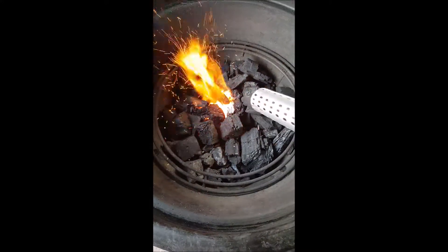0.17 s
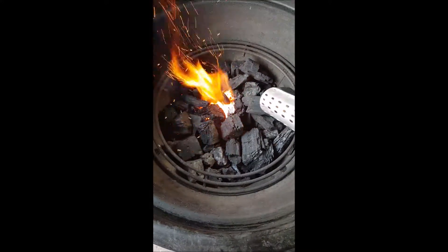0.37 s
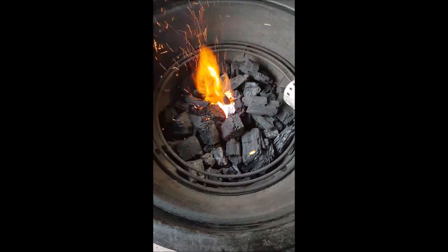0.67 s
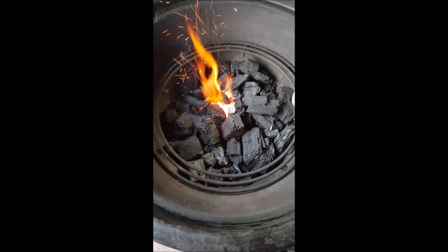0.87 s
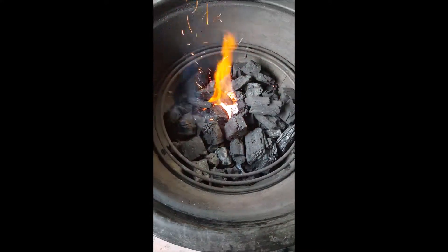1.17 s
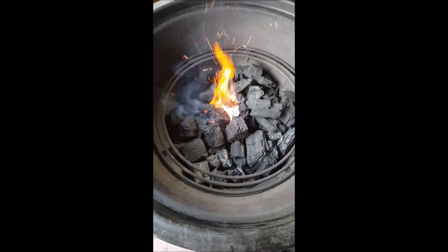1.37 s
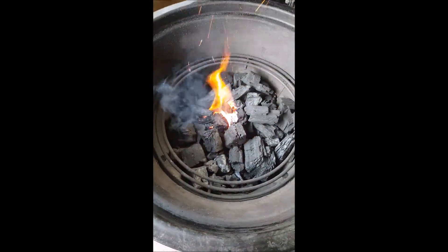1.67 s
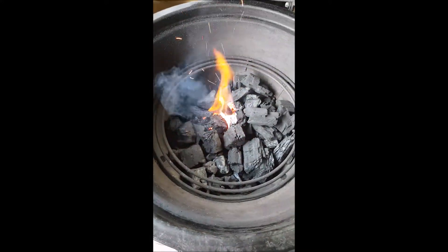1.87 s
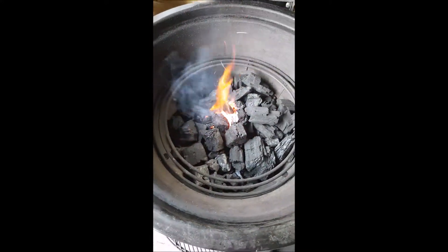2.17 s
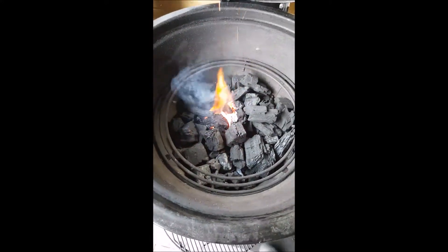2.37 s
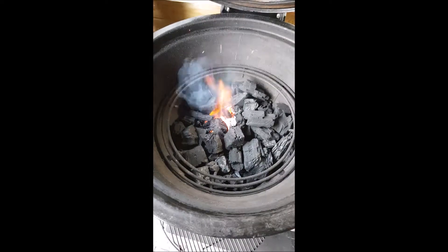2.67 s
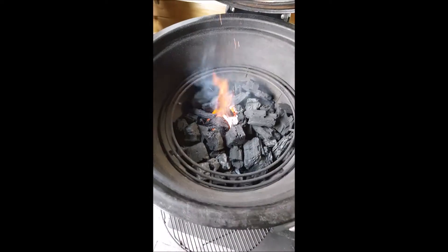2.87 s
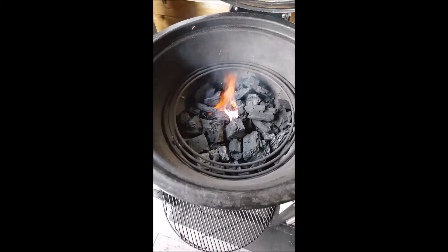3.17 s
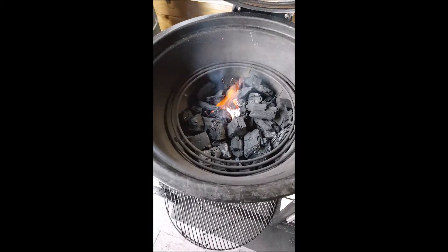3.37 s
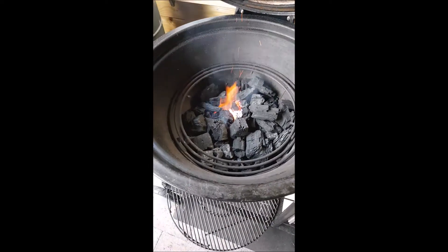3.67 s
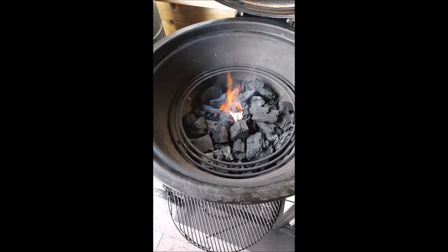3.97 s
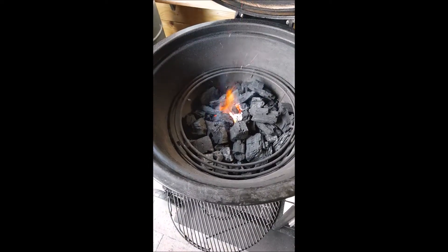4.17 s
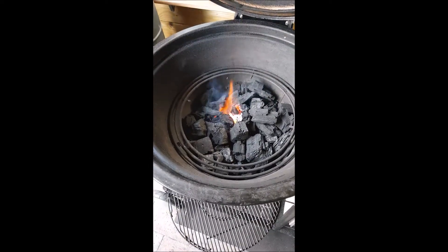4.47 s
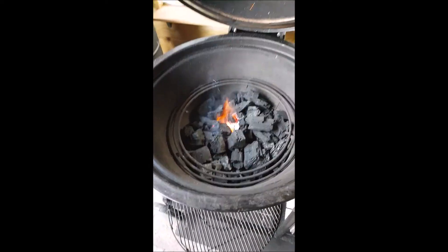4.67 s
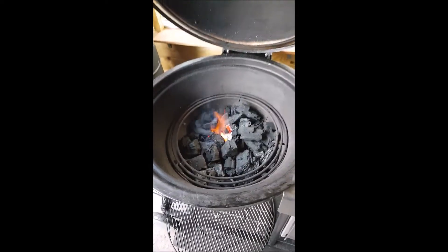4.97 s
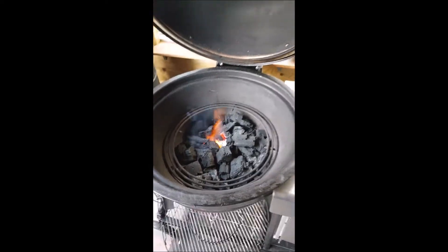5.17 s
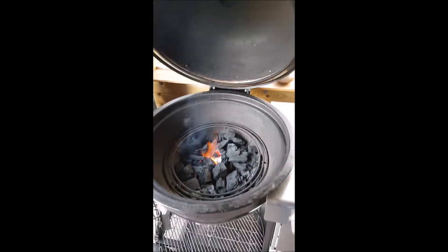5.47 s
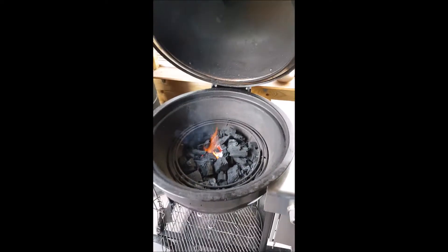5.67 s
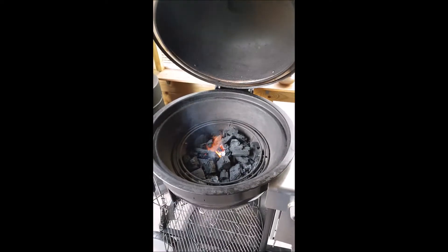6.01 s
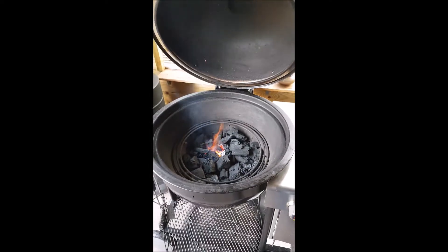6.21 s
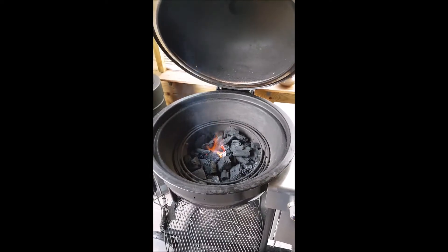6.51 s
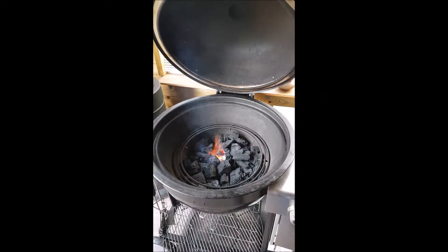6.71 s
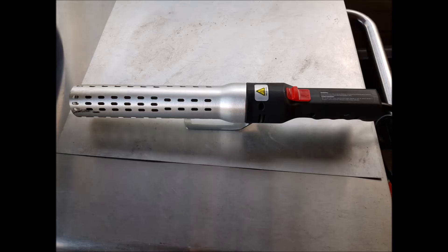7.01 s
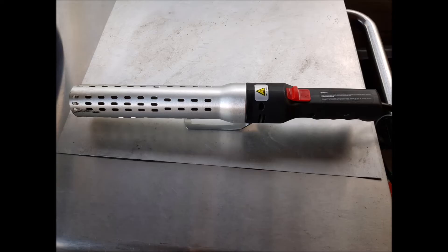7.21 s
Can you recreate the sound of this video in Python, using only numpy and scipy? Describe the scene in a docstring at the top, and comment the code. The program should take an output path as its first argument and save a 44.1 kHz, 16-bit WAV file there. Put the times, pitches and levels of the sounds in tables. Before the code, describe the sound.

Outdoors, a hand-held stereo phone is close to a deep grill bowl of lump charcoal. From 0 to about 1.2 s a small electric blower runs down: its airy rush and falling whirr fade, with a thin whistle around 5 kHz, while crackles come thick and sharp, with dull knocks up to 0.9 s. Afterwards the fire is exposed: bright, dry pops and tiny spits over a faint, patchy hiss, shortly ringing in the bowl and drifting from left toward right. Stronger snaps stand out near 1.4, 3.0, 4.7, 5.2 and 5.7 s. A soft puff comes at 2.7 s; low hum swells and distant traffic rumble lie beneath, bulging at 4.0 s. A small knock and gritty shoe scuff arrive around 4.95 s, then dull rustling until 5.7 s. Finger taps on the right come at 5.5 s, rubbing with faint squeaks and a low bump from 6.5 s, then sound stops abruptly at 6.76 s.

```python
"""In a deep grill bowl lump charcoal catches fire, heard by a hand-held phone: it pops, spits and sizzles.
Pops and spits are decaying noise bursts that excite the bowl; the hiss is patchy shaped noise.
A small blower, summed shaft orders and air noise, runs down in the first second.
Damped swings knock; shaped noise makes the scuff, rustle, puff, finger rub and far traffic; a low hum wavers.
The sound is cut off shortly before the end."""
import sys
import numpy as np
from scipy import signal
from scipy.fft import rfft, irfft, next_fast_len
from scipy.io import wavfile
from scipy.ndimage import uniform_filter1d, map_coordinates

SR = 44100
rng = np.random.default_rng(int(sys.argv[2]) if len(sys.argv) > 2 else 0)


def output_pcm(signal):
    """Save a mono or channel-first signal as 16-bit PCM at the path in sys.argv[1].

    Samples are clipped to [-1, 1] before scaling.
    """
    pcm = np.clip(np.atleast_2d(signal).T, -1, 1) * 32767
    wavfile.write(sys.argv[1], SR, np.round(pcm).astype(np.int16))


N = 324072

# Levels and spectra below are those of each source before the bowl, the stereo tilt and the phone.
# Prominent pops: t/s, energy level/dB of the top, low and middle part, fall t60/s
PROMINENT_POPS = [(.0632, -17, -27, -46, .017), (0.0773, -11.5, -35, -20.5, .008),
                  (0.0913, -14, -27, -19, .011), (0.1338, -17, -31, -36, .036),
                  (0.1766, -21, -25.5, -34, 0.007), (0.1838, -18.5, -33, -27, .017),
                  (0.2503, -18.5, -23.5, -30, 0.043), (0.2815, -10.5, -39, -22, 0.0021),
                  (0.2953, -10, -27.5, -18.5, 0.043), (.4095, -16.5, -35, -28, .007),
                  (0.4196, -17.5, -25, -22, .015), (.4547, -8.5, -25, -25, 0.021),
                  (0.4964, -13, -36, -27, 0.0054), (0.5318, -12.5, -34, -29, .01),
                  (0.563, -16.5, -36, -33, .01), (0.593, -11.5, -13.5, -12, 0.019),
                  (0.6431, -10, -41, -27, 0.0018), (.6914, -20, -21.5, -16.5, 0.037),
                  (0.7, -3.5, -30, -16.5, 0.0034), (.7451, -20, -52, -31, .007),
                  (0.7583, -20.5, -35, -44, 0.0082), (0.8386, -22.5, -26, -25, 0.025),
                  (0.8747, -20, -29.5, -43, .01), (0.9629, -8, -25, -20, 0.01),
                  (1.0097, -15.5, -31, -25.5, 0.0098), (1.1408, -20.5, -42, -28, .021),
                  (1.1509, -20, -35, -48, .012), (1.224, -19, -33, -34, 0.023),
                  (1.2642, -20, -36, -34, 0.034), (1.3222, -23.5, -34, -33, 0.044),
                  (1.375, -27, -35, -34, 0.023), (1.3814, -9, -22, -17.5, 0.02),
                  (1.401, -25.5, -38, -37, .03), (1.565, -26.5, -44.5, -41, 0.027),
                  (1.661, -25.5, -60, -44, 0.012), (1.681, -20, -62, -28, .019),
                  (1.738, -25, -41.5, -33, 0.0077), (1.8585, -27.5, -63, -53, .017),
                  (1.8754, -16.5, -37, -35, 0.014), (1.9413, -23, -66, -40, 0.012),
                  (1.9685, -22, -43.5, -36, 0.018), (2.1105, -20.5, -38.5, -34.5, .016),
                  (2.2971, -23.5, -42, -41, .006), (2.3184, -15, -38, -20.5, 0.022),
                  (2.3584, -19.5, -36, -37, 0.092), (2.415, -18, -46, -37, 0.0061),
                  (2.4494, -18.5, -43, -32.5, 0.0068), (2.5868, -21.5, -35.5, -28, .01),
                  (2.6196, -25, -37.5, -38, 0.079), (2.7203, -25, -39, -33, .012),
                  (2.755, -27.5, -53, -33, .01), (2.8018, -27, -56, -45, .019),
                  (2.8674, -16.5, -54, -39, .024), (2.9395, -20, -40, -28.5, .018),
                  (2.95, -18.5, -35, -25.5, .03), (3.0396, -9.5, -27.5, -20, .006),
                  (3.058, -14.5, -47, -26.5, .011), (3.066, -26.5, -42, -43, .028),
                  (3.1447, -24, -67, -36, .019), (3.1643, -23.5, -59, -43, .014),
                  (3.2405, -14.5, -71, -27, 0.018), (3.335, -14.5, -67, -33, .012),
                  (3.3618, -17.5, -60, -28, 0.064), (3.453, -23, -59, -46, 0.009),
                  (3.4783, -22, -63, -54, 0.0029), (3.6544, -25.5, -41, -37, 0.03),
                  (3.741, -29, -43, -40, 0.02), (3.8706, -24.5, -48, -47, 0.031),
                  (3.9207, -21.5, -57, -46, .015), (4.0386, -20.5, -65, -40, 0.013),
                  (4.0826, -26.5, -49, -35.5, .019), (4.1153, -23.5, -38.5, -31, 0.019),
                  (4.127, -20.5, -52, -48, .005), (4.2714, -19.5, -30.5, -27.5, 0.15),
                  (4.458, -25.5, -73, -40.5, 0.019), (4.6529, -9.5, -58, -28, 0.011),
                  (4.8551, -25, -63, -40, .01), (5.0145, -26, -33, -52, .023),
                  (5.1865, -10.5, -28, -26.5, 0.0073), (5.252, -25, -56, -44, .005),
                  (5.2824, -23.5, -52, -34.5, 0.0099), (5.334, -16.5, -35, -26.5, 0.025),
                  (5.3688, -18, -39, -47, .009), (5.5718, -24.5, -56, -37, .005),
                  (5.605, -26, -43, -31.5, 0.051), (5.6643, -20.5, -64, -59, 0.037),
                  (5.743, -10.5, -22, -19, .036), (5.8302, -15.5, -22, -20.5, 0.012),
                  (5.9483, -17, -51, -27, 0.0059), (6.0045, -35.5, -41, -36, .1),
                  (6.057, -45, -37, -41, 0.0076), (6.17, -20.5, -53, -36, 0.0064),
                  (6.2127, -22, -66, -29, 0.036), (6.3413, -17.5, -55, -46, .024),
                  (6.3943, -21, -67, -59, 0.059), (6.4676, -23.5, -53, -40, .017),
                  (6.5215, -23, -55, -36, 0.032), (6.5492, -17.5, -62, -28.5, 0.03)]
# Parts of a pop in the order top, low, middle: lower f/Hz, upper f/Hz
POP_BANDS = [(9500, 16800), (1300, 3500), (3500, 8200)]
RISE_T60_S = .006  # every pop swells by 60 dB in this time
# Faint pops between: top part, its scatter, median fall; low and middle parts relative to the top
FAINT_DB, FAINT_SPREAD_DB, FAINT_T60_S = -29, 3, .014
FAINT_LOW_DB, FAINT_MID_DB = -30, -19
# Pops start on the left and drift right as the phone turns, with random scatter
LEFT_DB, TURN_DB_PER_S, SCATTER_DB = 3, 1, 2.5
# Common level of spits and hiss, ahead of their own offsets: t/s, level/dB
SIZZLE_LEVEL = [(0, -49.5), (.25, -51.5), (.62, -58), (.8, -60.5), (1.73, -62), (2.52, -57), (3.4, -57),
                (5.14, -58), (5.95, -60.5), (6.58, -62), (6.66, -63)]
# Relative spectrum of spits and hiss: f/Hz, level/dB per Hz
SIZZLE_SPECTRUM = [(880, -42), (1500, -32.5), (2000, -8), (2430, -19.5), (4660, -3), (7550, -1.5),
                   (9370, -2), (10900, 6), (15000, 4), (16000, -1)]
# Decay of the bowl's ring: f/Hz, t60/s
BOWL_DECAY = [(500, 0.14), (2000, 0.25), (6000, 0.15), (15000, 0.075)]
# Dull knocks, lumps shifting and fingers on the phone: t/s, swing level/dB, swing f/Hz, swing t60/s,
# left-right level/dB, contact level/dB before its filter, upper contact f/Hz
KNOCK_EVENTS = [(.03, -65.5, 141, 0.1066, 8.5, -30.5, 910), (0.177, -50, 133, 0.19, 4.5, -44, 1500),
                (0.246, -49, 150, 0.051, 5, -30.5, 786), (0.309, -52.5, 135, 0.073, 3.5, -37.5, 800),
                (0.376, -49, 139, 0.25, 4, -29, 1237), (.593, -36, 470, 0.074, 6, -27, 980),
                (.697, -54.5, 483, 0.045, 10, -34, 1400), (0.846, -55.5, 490, 0.038, 11, -39, 900),
                (1.402, -54, 130, 0.11, 2, -37.5, 900), (4.27, -55, 315, .05, 7, -39.5, 980),
                (4.916, -65, 300, 0.027, 11, -47.5, 6030), (4.942, -63, 300, 0.0303, 7, -56, 4000),
                (4.95, -49, 540, 0.043, -2, -35.5, 2500), (5.487, -41, 159, 0.018, -19.5, -44, 895),
                (5.552, -37, 144, 0.015, -18, -44, 860), (6.658, -33.5, 71, 0.13, -24, -51.5, 3000)]
# Blower running down: t/s, air rush level/dB, nozzle whistle level/dB
BLOWER_LEVELS = [(0.0, -43.5, -70), (0.18, -47.5, -57), (0.572, -51, -53.5), (1.118, -63.5, -67.5),
                 (1.3, -83, -87)]
# Relative spectrum of the air rush: f/Hz, level/dB per Hz
AIR_SPECTRUM = [(180, -35), (300, -2.5), (402, -7), (531, 1.5), (583, -6), (746, -3.5), (1180, -8),
                (1590, -3.5), (3440, -3.5), (4400, -8), (5060, 1.5), (8030, -9.5), (12000, -4),
                (15600, -29), (22000, -120)]
# Common gain of all shaft tones: t/s, level/dB
MOTOR_GAIN = [(0, -63), (.25, -68), (.45, -75), (.85, -90), (1.5, -100)]
# Low shaft tones relative to that gain: shaft order, level/dB
LOW_ORDERS = [(5, 0), (6, 0), (7, 6), (8, -4), (10, 5), (11, 6), (12, -1), (15, 7), (20, 4)]
# High shaft tones at full nozzle resonance, relative to that gain: shaft order, level/dB
HIGH_ORDERS = [(38, 10), (40, 9), (45, 16), (50, 17), (55, 9), (62, 9), (72, 10)]
# Whistling resonance of the nozzle: t/s, f/Hz
NOZZLE_PITCH = [(0, 4870), (.3, 4900), (.6, 5050), (.9, 5400), (1.5, 5500)]
SHAFT_HZ, SLOWING_PER_S, FRICTION_PER_S2 = 135.5, .97, .1  # speed at switch-off and its decay exponents
# Shoe scuff: t/s, level/dB
SCUFF_LEVEL = [(4.8, -99), (4.866, -67.5), (4.948, -40.5), (5.12, -74.5)]
# Relative spectrum of the scuff: f/Hz, level/dB per Hz
GRIT_SPECTRUM = [(180, -37), (300, -8.5), (556, -4.5), (1240, -17), (2070, -2.5), (3230, -7.5), (3950, -13),
                 (4610, -9), (7320, -17.5), (12000, -13.5), (15600, -45), (22000, -120)]
# Finger sliding over the phone: t/s, level/dB
RUB_LEVEL = [(6.5, -76), (6.56, -66), (6.66, -59.5), (6.76, -61.5)]
# Relative spectrum of the sliding finger: f/Hz, level/dB per Hz
SKIN_SPECTRUM = [(120, -24.5), (200, -0.5), (348, -8), (834, -14.5), (966, -6), (1800, -14.5),
                 (2000, -15.5), (3000, -21), (3900, -52), (6600, -120)]
# Thin squeaks of the finger: start t/s, end t/s, f/Hz, peak level/dB
FINGER_SQUEAKS = [(5.605, 5.64, 5350, -62), (6.55, 6.615, 1890, -64), (6.685, 6.73, 2030, -68),
                  (6.725, 6.76, 1900, -66)]
# Dull rustle: t/s, level/dB
RUSTLE_LEVEL = [(4.98, -70), (5.05, -57.5), (5.2, -62.5), (5.32, -62), (5.42, -70), (5.55, -59), (5.7, -75)]
# Relative spectrum of the rustle: f/Hz, level/dB per Hz
RUSTLE_SPECTRUM = [(88, -32), (150, -5.5), (378, -3.5), (818, -16.5), (918, -12.5), (1500, -34),
                   (1950, -53), (3300, -120)]
# Soft puff of air: t/s, level/dB
PUFF_LEVEL = [(2.6, -78), (2.696, -49), (2.8, -81)]
# Relative spectrum of the puff: f/Hz, level/dB per Hz
PUFF_SPECTRUM = [(88, -45), (150, -7), (308, 7.5), (366, -14), (435, 0.5), (829, -21), (900, -27),
                 (1170, -59), (1980, -120)]
# Swells of the low hum: t/s, peak level/dB
HUM_SWELLS = [(.01, -51), (.3, -62.5), (.6, -51), (.85, -57), (1.98, -62), (2.31, -55.5), (2.62, -65),
              (3.04, -62)]
HUM_HZ, HUM_RISE_DB_PER_S, HUM_FALL_DB_PER_S = 132.9, 250, 148
# Far traffic: t/s, rumble level/dB, drone level/dB
TRAFFIC_LEVELS = [(0, -56, -59), (.46, -58, -67), (1.4, -59.5, -67.5), (2.06, -57.5, -67.5),
                  (2.37, -55.5, -62), (2.94, -55, -63), (3.03, -50.5, -61), (3.84, -50.5, -64),
                  (3.95, -52.5, -63), (4.04, -43.5, -60.5), (4.14, -54, -60), (4.4, -54, -63.5),
                  (5.11, -54, -61), (5.35, -55, -55), (5.46, -54.5, -61.5), (6.34, -55, -63.5),
                  (6.56, -53.5, -64.5), (6.6, -54.5, -74.5)]
# Relative spectrum of the rumble: f/Hz, level/dB per Hz
RUMBLE_SPECTRUM = [(12, -50.5), (20, -21), (29, -20), (40, -7), (59, 1), (76, -2), (103, -17.5),
                   (135, -15.5), (200, -21.5), (260, -50.5), (440, -120)]
# Relative spectrum of the drone: f/Hz, level/dB per Hz
DRONE_SPECTRUM = [(59, -26), (100, -5.5), (183, -18.5), (241, -12.5), (366, -19), (721, -20), (1340, -28),
                  (2160, -37), (2440, -33.5), (4000, -44.5), (5200, -60.5), (8800, -120)]
LUMPS_DB = 2  # how far the rumble heaves
# Likeness of the two sides in the shaped noises (hiss, air rush, scuff, rustle, puff, finger rub, traffic):
# f/Hz, left-right correlation
STEREO_LIKENESS = [(60, 0.94), (180, 0.81), (550, 0.4), (1650, -0.14), (4970, 0.12), (15000, -0.26)]
CUT_S, TOP_HZ = 6.757, 16900  # where the sound stops; band limit of the phone


def amp(db):
    """Level principle: amplitude gain is ten to the power dB/20."""
    return 10 ** (np.asarray(db) / 20)


def unit(x):
    """Normalization: scales x to rms 1."""
    return x / np.sqrt(np.mean(x ** 2) + 1e-20)


def along(points, hz):
    """Logarithmic pitch scale: interpolates (f/Hz, value) points along log frequency."""
    f, value = np.transpose(points)
    return np.interp(np.log(hz + 1), np.log(f + 1), value)


def curves(rows, after=None):
    """Envelope principle: each column per sample; -150 before the table, held or set to `after` behind it."""
    s, *columns = np.transpose(rows)
    t = np.arange(N) / SR
    return [np.interp(t, s, column, left=-150, right=after) for column in columns]


def wobble(rate, size=N):
    """Slow random fluctuation: a smooth curve through normal random knots, `rate` per second."""
    knots = rng.standard_normal(int(size * rate / SR) + 4)
    return map_coordinates(knots, [np.arange(size) * rate / SR])


def filtered(x, response):
    """Linear filtering: the spectrum of x times a response of frequency."""
    m = next_fast_len(N + SR // 2)
    hz = np.fft.rfftfreq(m, 1 / SR)
    return irfft(rfft(x, m) * response(hz), m)[..., :N]


def placed(s, shapes):
    """Superposition: stereo sounds (events, 2, length) are summed at their start times."""
    at = np.round(s * SR).astype(int)[:, None] + np.arange(shapes.shape[2])
    return np.array([np.bincount(at.ravel(), shapes[:, c].ravel(), N + SR)[:N] for c in (0, 1)])


def sides(pan_db):
    """Level panning: left and right gains share a level difference, positive to the left."""
    return amp(np.outer(pan_db, [.5, -.5]))[:, :, None]


def rush(spectrum, patchy_db):
    """Turbulent noise of rms 1: random gain patches in time and frequency, left-right correlation by table."""
    z = signal.stft(rng.standard_normal((2, N)), nperseg=512)[2]
    field = uniform_filter1d(rng.standard_normal(z.shape[1:]), size=8, axis=0)
    field = uniform_filter1d(field, size=6, axis=1)
    pair = signal.istft(z * amp(patchy_db * unit(field)), nperseg=512)[1][:, :N]

    def mid_side_gains(hz):
        # cos(2 * angle) is the correlation of the two sides
        angle = np.arccos(np.clip(along(STEREO_LIKENESS, hz), -1, 1)) / 2
        return amp(along(spectrum, hz)) * [np.cos(angle), np.sin(angle)]

    mid, side = filtered(pair, mid_side_gains)
    return unit(np.array([mid + side, mid - side]))


def pops(count=90):
    """Impulsive fracture: each pop is noise that swells and dies exponentially, split into three bands."""
    chance = rng.standard_normal((count, 4))
    faint_top = FAINT_DB + FAINT_SPREAD_DB * chance[:, 0]
    faint_low = faint_top + FAINT_LOW_DB + 5 * chance[:, 1]
    faint_mid = faint_top + FAINT_MID_DB + 6 * chance[:, 2]
    faint_fall = FAINT_T60_S * amp(4 * chance[:, 3])
    faint = [rng.random(count) * CUT_S, faint_top, faint_low, faint_mid, faint_fall]
    s, top_db, low_db, mid_db, fall = np.hstack([np.transpose(PROMINENT_POPS), faint])
    pan_db = LEFT_DB - TURN_DB_PER_S * s + SCATTER_DB * rng.standard_normal(len(s))
    lead = 256 / SR  # room for the swell ahead of the peak
    t = np.arange(1536) / SR
    shape = amp(60 * np.minimum((t - lead) / RISE_T60_S, (lead - t) / fall[:, None, None]))
    crack = rng.standard_normal((len(s), 2, len(t))) * shape
    crack = crack / np.linalg.norm(crack, axis=2, keepdims=True) * sides(pan_db)
    out = 0
    for (lo, hi), part_db in zip(POP_BANDS, (top_db, low_db, mid_db)):
        def band(hz):
            # the gain makes up for the energy outside the band
            edges = (1 + (lo / (hz + 1)) ** 10) * (1 + (hz / hi) ** 10)
            return np.sqrt(SR / 2 / (hi - lo) / edges)

        part = placed(np.abs(s - lead), crack * amp(part_db)[:, None, None])
        out = out + filtered(part, band)
    return out


def sizzle(count=4000):
    """Shot noise over turbulence: tiny splinters, a few larger, spit over gas hissing from the pores."""
    start, rarity, place = rng.random((3, count))
    t = np.arange(128) / SR
    size = amp(-4 * np.log(rarity + 0.0048))[:, None, None] * sides(6 * (place - .5))
    bursts = size * rng.standard_normal((count, 2, len(t))) * amp(-60 * t / .004)  # t60 4 ms
    spits = placed(start * N / SR, bursts)
    spits = unit(filtered(spits, lambda hz: amp(along(SIZZLE_SPECTRUM, hz))))
    level = amp(curves(SIZZLE_LEVEL)[0] + 1.5 * wobble(25))
    return level * amp(-3.0) * spits, level * amp(0.5) * rush(SIZZLE_SPECTRUM, patchy_db=3.5)


def bowl(x, piece=8192):
    """Reverberation by convolution: successive fixed-length pieces of sound get random decaying noise tails."""
    count = N // piece + 1
    hz, t, z = signal.stft(rng.standard_normal((2, count, piece // 2)), SR, nperseg=128)
    tails = signal.istft(z * amp(-60 * t / along(BOWL_DECAY, hz)[:, None]), SR, nperseg=128)[1]
    tails = tails / np.linalg.norm(tails, axis=2, keepdims=True)
    delay = 88  # samples: the first wall answers after 2 ms
    pieces = np.pad(x, ((0, 0), (delay, count * piece - N - delay))).reshape(2, count, piece)
    wet = signal.fftconvolve(pieces, tails, axes=2)
    return placed(np.arange(count) * piece / SR, wet.transpose(1, 0, 2))


def knocks():
    """Damped oscillation: a swing starts stiff and sags in pitch, with a dull noise burst at the contact."""
    s, db, hz, t60, pan_db, contact_db, edge_hz = np.transpose(KNOCK_EVENTS)[:, :, None, None]
    t = np.arange(8192) / SR
    sag = .4 * (1 - np.exp(-t / .003))  # extra turns gained while the contact is stiff
    swing = -amp(db - 60 * t / t60) * np.sin(2 * np.pi * (hz * t + sag))
    contact = amp(contact_db - 60 * np.abs(t - 64 / SR) / 0.024)  # t60 24 ms on both flanks
    burst = contact * rng.standard_normal((len(s), 1, len(t)))
    f = np.fft.rfftfreq(len(t), 1 / SR)
    burst = irfft(rfft(burst) / np.sqrt((1 + (f / edge_hz) ** 6) * (1 + (250 / (f + 1)) ** 4)))
    return placed(s.ravel(), (swing + burst) * sides(pan_db.ravel()))


def blower():
    """Rotor harmonics and resonance: as the shaft slows, high orders light up sliding through the nozzle's."""
    air_db, whistle_db = curves(BLOWER_LEVELS, after=-150)
    size = 2 * SR
    t = np.arange(size) / SR
    shaft = SHAFT_HZ * np.exp(-SLOWING_PER_S * t - FRICTION_PER_S2 * t ** 2)
    angle = 2 * np.pi * np.cumsum(shaft) / SR
    nozzle = curves(NOZZLE_PITCH)[0][:size]

    def resonance(hz, centre, width):
        return 1 / (1 + (2 * (hz - centre) / width) ** 2)

    tones = np.zeros((2, size))
    for order, db in LOW_ORDERS:
        housing = .6 + .5 * resonance(order * shaft, 830, 260)
        unsteady = 2 * wobble(15, size=size)
        tones += housing * amp(db + unsteady) * np.sin(order * angle + rng.random((2, 1)))
    for order, db in HIGH_ORDERS:
        lit = resonance(order * shaft, nozzle, 500)
        unsteady = 1.5 * wobble(25, size=size)
        tones += lit * amp(db + unsteady) * np.sin(order * angle + rng.random((2, 1)))
    flutter = np.array([wobble(400, size=size), wobble(400, size=size)])
    whistle = unit(flutter * np.sin(2 * np.pi * np.cumsum(nozzle) / SR))
    tonal = amp(curves(MOTOR_GAIN)[0][:size]) * tones + amp(whistle_db[:size]) * whistle
    air = amp(air_db) * rush(AIR_SPECTRUM, patchy_db=4.0)
    return np.pad(tonal, ((0, 0), (0, N - size))) + air


def scuff():
    """Sliding friction: a sole drags over gritty paving as rapidly fluctuating noise."""
    return amp(curves(SCUFF_LEVEL, after=-150)[0] + 1.2 * wobble(250)) * rush(GRIT_SPECTRUM, patchy_db=1.5)


def fingers():
    """Friction noise: a finger slides over the phone as shaped noise, with thin sine squeaks."""
    t = np.arange(N) / SR
    out = amp(curves(RUB_LEVEL)[0]) * rush(SKIN_SPECTRUM, patchy_db=0.5)
    for start, end, hz, db in FINGER_SQUEAKS:
        swell = np.abs(np.sin(np.pi * np.clip((t - start) / (end - start), 0, 1))) ** .5
        out = out + amp(db + 2 * wobble(60)) * swell * np.sin(2 * np.pi * hz * t)
    return out


def rustle():
    """Broadband friction noise: a dull, unsteady rustle near the phone."""
    return amp(curves(RUSTLE_LEVEL, after=-150)[0] + 2.3 * wobble(40)) * rush(RUSTLE_SPECTRUM, patchy_db=0)


def puff():
    """Low-frequency turbulence: one soft puff of air as shaped noise."""
    return amp(curves(PUFF_LEVEL, after=-150)[0]) * rush(PUFF_SPECTRUM, patchy_db=1.0)


def hum():
    """Amplitude modulation: random wavering widens one low sine, in phase on both sides; it comes in swells."""
    t = np.arange(N) / SR
    swells = 0
    for s, peak_db in HUM_SWELLS:
        slope_db = np.minimum(HUM_RISE_DB_PER_S * (t - s), HUM_FALL_DB_PER_S * (s - t))
        swells = swells + amp(peak_db + slope_db)
    return swells * unit((1 + .5 * wobble(30)) * np.sin(2 * np.pi * HUM_HZ * t))


def traffic():
    """Distant broadband source: a far road gives a lumpy rumble and a drone above it."""
    rumble_db, drone_db = curves(TRAFFIC_LEVELS)
    rumble = amp(rumble_db + LUMPS_DB * wobble(9)) * rush(RUMBLE_SPECTRUM, patchy_db=2.0)
    drone = amp(drone_db + 1.3 * wobble(14)) * rush(DRONE_SPECTRUM, patchy_db=1.5)
    return rumble + drone


def scene():
    """Superposition: fire with its reverberation, knocks and fingers, and beds tilted 1.4 dB to the left."""
    spits, hiss = sizzle()
    fire = pops() + spits
    beds = hiss + blower() + scuff() + rustle() + puff() + hum() + traffic()
    tilt = amp([[.7], [-.7]])
    return fire + amp(-6) * bowl(fire) + knocks() + fingers() + beds * tilt


def record(dry):
    """Band limitation: the sound stops within milliseconds; the phone cuts deep bass and top treble."""
    t = np.arange(N) / SR
    on = amp(np.clip(-4000 * (t - CUT_S), -200, 0))  # falls 4 dB per ms

    def phone(hz):
        treble = (hz < TOP_HZ) / np.sqrt(1 + (hz / 16100) ** 120)
        return treble / np.sqrt(1 + (30 / (hz + 1)) ** 8)

    return filtered(dry * on, phone)


dry = scene()
out = record(dry)
output_pcm(out)
```